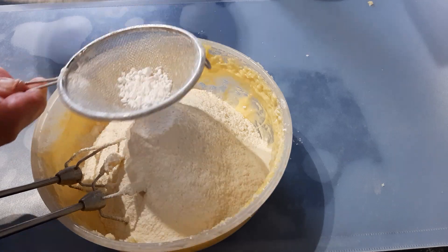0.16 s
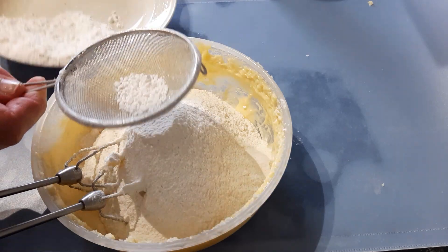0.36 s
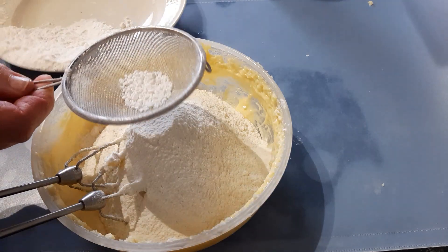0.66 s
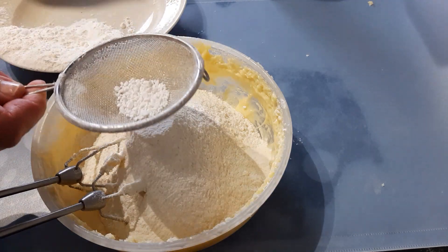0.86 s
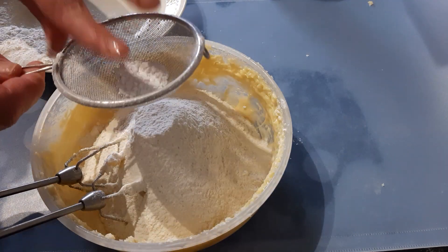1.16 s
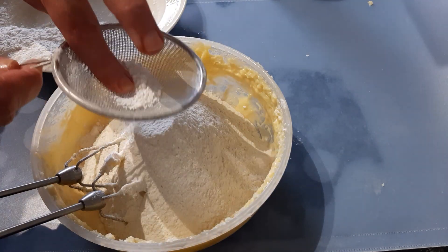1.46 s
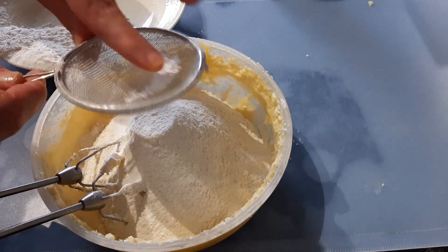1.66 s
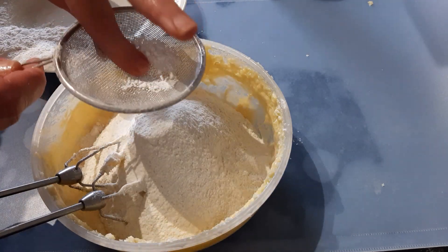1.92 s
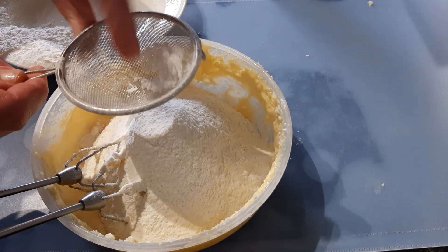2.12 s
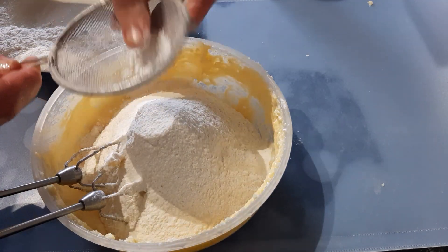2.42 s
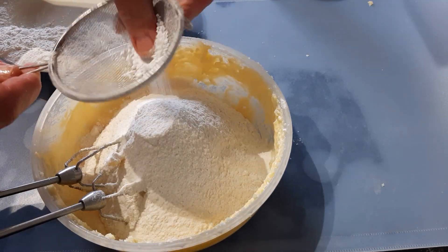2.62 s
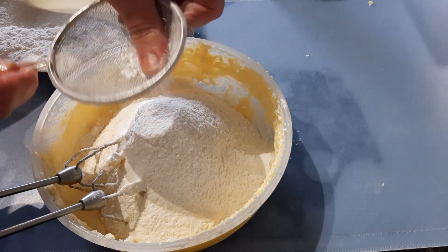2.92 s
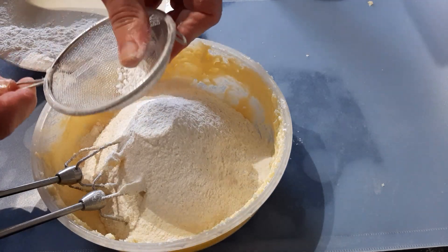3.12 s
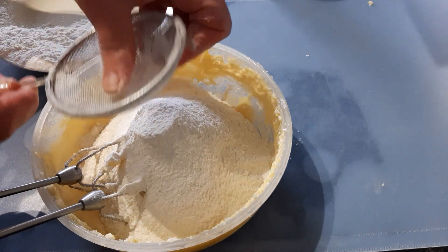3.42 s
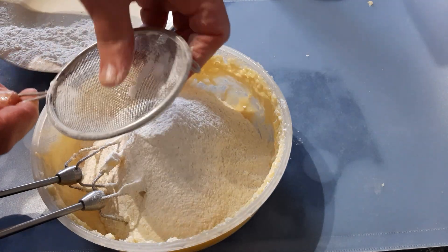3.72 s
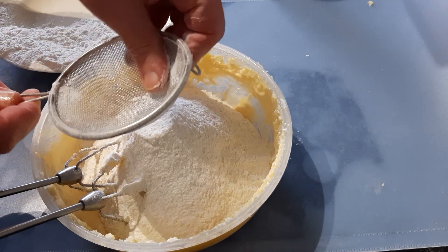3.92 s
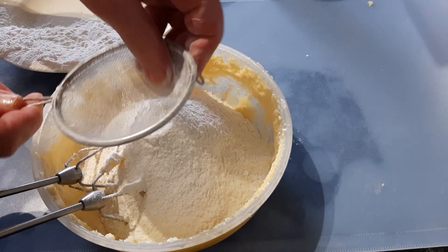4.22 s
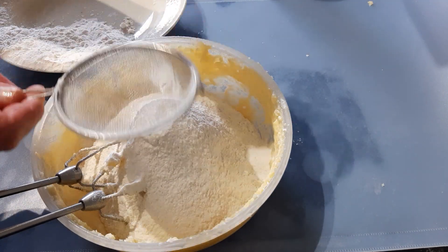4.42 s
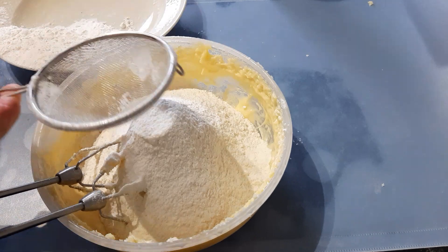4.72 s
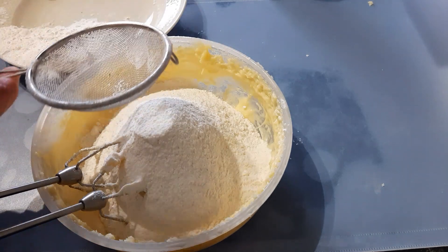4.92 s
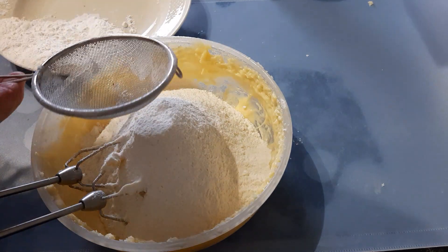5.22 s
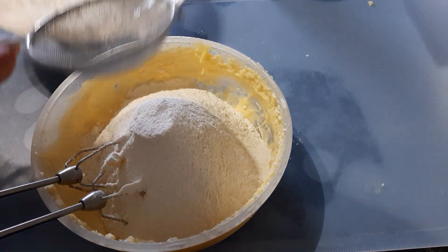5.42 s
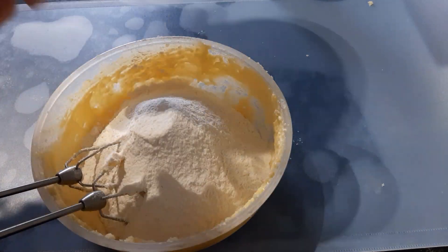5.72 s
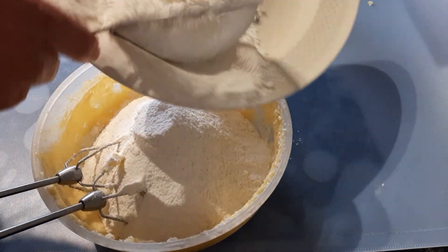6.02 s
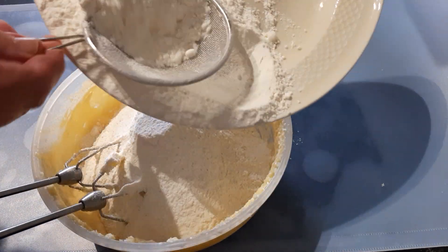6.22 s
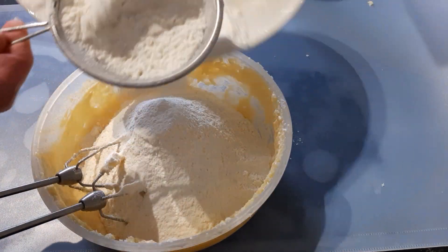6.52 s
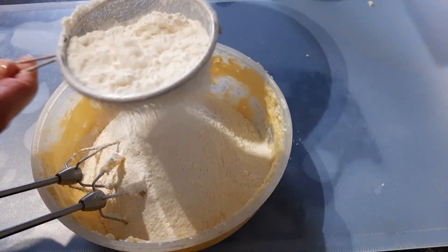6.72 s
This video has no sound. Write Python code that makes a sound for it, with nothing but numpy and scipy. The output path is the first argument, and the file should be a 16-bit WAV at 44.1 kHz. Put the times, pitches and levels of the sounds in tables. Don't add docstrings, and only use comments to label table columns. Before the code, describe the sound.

In a quiet kitchen with a low fridge hum and street rumble, a plate lands loudly on a table, bounces and rocks to rest with hollow, ringing knocks. Later a thumb rubs flour through wire mesh in soft, bright hissing strokes with tiny snaps. Finally the strainer's rim brushes, scrapes and clatters on the glazed plate. Close stereo microphone, hum leaning left.

```python
import sys
import numpy as np
from scipy import signal
from scipy.fft import rfft, irfft, next_fast_len
from scipy.io import wavfile
from scipy.ndimage import uniform_filter1d

SR = 44100
rng = np.random.default_rng(int(sys.argv[2]) if len(sys.argv) > 2 else 0)


def wav_record(signal):
    frames = np.transpose(np.atleast_2d(signal))
    bounded = np.clip(frames, -1, 1)
    quanta = np.round(bounded * 32767).astype(np.int16)
    wavfile.write(sys.argv[1], SR, quanta)


def ratio_of_db(decibels):
    return 10 ** (np.asarray(decibels, float) / 20)


N = 302481
TIME = np.arange(N) / SR
FFT = next_fast_len(N, True)
HZ = np.maximum(np.arange(FFT // 2 + 1) * SR / FFT, 1.)
KNOCK_PAN_DB, BASS_PAN_DB = 4, 4

# pitch_hz [Hz], level_db [dB]
GLAZE = [(3860, 5), (4790, -3), (5820, -1.5), (6330, 5), (7480, -3), (8330, 5), (8900, -1), (9420, 2),
         (9920, -12), (10900, -4), (12110, -10), (12700, -11.5), (13100, 1), (14950, -3.5)]


def on_hz(table):
    hz, value = np.transpose(table)
    return np.interp(np.log(HZ), np.log(hz), value)


def shape(x, gain):
    return irfft(rfft(x, FFT) * gain, FFT)[..., :N]


def unit(x):
    return x / np.sqrt(np.mean(x ** 2))


def band(lo_hz, hi_hz, order=3):
    return 1 / np.sqrt((1 + (lo_hz / HZ) ** (2 * order)) * (1 + (HZ / hi_hz) ** (2 * order)))


def resonances(peaks):
    return sum(ratio_of_db(db) / np.sqrt(1 + (2 * (HZ - hz) / width) ** 2) for hz, width, db in peaks)


def pan(db):
    return ratio_of_db(np.array([db, -db]) / 2)


def fade(t, t60):
    return np.exp(-np.log(1000) * t / t60)


def walk(rate):
    k = int(SR / rate)
    held = np.repeat(rng.standard_normal(N // k + 1), k)
    return 0.36 * uniform_filter1d(uniform_filter1d(held, k), k)[:N]


def pair(length=N):
    likeness = [(60, 0.3), (120, .93), (250, 0.5), (500, 1), (1000, 0.09), (3000, 0.04)]
    alike = np.clip(on_hz(likeness), 0, 1)
    mid, side = rng.standard_normal((2, length))
    mid, side = shape(mid, np.sqrt(1 + alike)), shape(side, np.sqrt(1 - alike))
    return np.array([mid + side, mid - side])[:, :length] / 2


def room_air():
    # time_s [s], level_db [dB]
    rumble = [(0.0, -65), (0.26, -71.5), (1.05, -67), (1.35, -68.5), (1.63, -76.5), (1.87, -72),
              (2.1, -66.5), (2.44, -71), (2.78, -64.5), (3.22, -69.5), (3.48, -66), (3.9, -68.5),
              (4.66, -70), (4.97, -64), (5.21, -70), (6.21, -68.5), (6.66, -74), (6.76, -64.5)]
    # pitch_hz [Hz], level_db [dB per Hz]
    floor_colour = [(25, -34.5), (40, -1.5), (55, -2), (100, -1.5), (150, -6.5), (270, -9), (340, -22.5),
                    (630, -23.5), (1000, -24.5), (1600, -31.5), (2500, -29.5), (5000, -37), (10000, -36.5),
                    (14000, -32)]
    # pitch_hz [Hz], width_hz [Hz], level_db [dB over the rumble]
    hum_peaks = [(111.77, 11, 6), (198.8, 13, 4.5), (243.5, 10, 7.5), (304, 8.2, 4), (574.7, 22, 4),
                 (1600, 30, 4.5), (3170, 83, 0), (7330, 89.3, -2.5)]
    # pitch_hz [Hz], left_minus_right_db [dB]
    floor_pan = [(40, 10.5), (120, 12), (250, 11.5), (450, 2.5), (1500, 3), (15000, 2)]
    lorry_s, lorry_lasts_s, lorry_db, port_lag_s = 4.38, 0.49, 10, .0007

    hum_db = np.interp(TIME, *np.transpose(rumble))
    deep_db = hum_db - 7.5 + lorry_db * np.exp(-((TIME - lorry_s) / lorry_lasts_s) ** 2)
    side = on_hz(floor_pan)
    colour = ratio_of_db(on_hz(floor_colour) + np.array([side, -side]) / 2) * (1 + resonances(hum_peaks))
    lag = np.exp(-2j * np.pi * np.minimum(HZ, 80) * port_lag_s * 2)
    air = shape(pair(), colour * np.array([lag, lag * 0 + 1]))
    layers = [shape(air, band(lo, hi, order=5)) for lo, hi in ((20, 80), (80, 350), (350, 20000))]
    deep, hum, hiss = (layer / np.std(layer.mean(axis=0)) for layer in layers)
    out = ratio_of_db(deep_db + 4.5 + 1.4926 * walk(3.4)) * deep
    out += ratio_of_db(hum_db + 0.5 + 1.653 * walk(2.0)) * hum
    return out + ratio_of_db(-77.5 + 0.382 * walk(8.5)) * hiss


def fridge_whine():
    whine = [(3058, -85, 6), (2958, -95, 4), (3158, -92.5, 4), (3108, -97, 4), (7300, -87.5, 0),
             (7250, -96, 0), (7400, -96, 0)]
    loaded_s, unloaded_s, ramp_s = 1.34, 5.8, 0.075
    load = np.clip(np.minimum(TIME - loaded_s, unloaded_s - TIME) / ramp_s + .5, 0, 1)
    out = np.zeros((2, N))
    for hz, db, pan_db in whine:
        level_db = db + 5 - 5 * (1.5 - load) + .8 * walk(6)
        tone = np.sin(2 * np.pi * (hz * TIME + rng.random((2, 1))))
        out += ratio_of_db(level_db) * pan(pan_db)[:, None] * tone
    return out


def swell(start, top, end, first_db, top_db, gone_db=-82.5):
    land_s, fall_bend = 0.027, 1.2
    rise = np.interp(TIME, [start - land_s, start, top], [gone_db, first_db, top_db], left=-130)
    fall = np.clip((TIME - top) / max(end - top, .02), 0, 6) ** fall_bend
    trickle = np.where(TIME > top, -17 - 121 * (TIME - top), -130)
    return np.maximum(rise + np.maximum(min(gone_db - top_db, -12) * fall, trickle), -130)


def grains(scatter_db, smear_s):
    size = ratio_of_db(scatter_db * np.minimum(rng.exponential(size=N), 7))
    keep = np.exp(-1 / (smear_s * SR))
    return unit(signal.lfilter([1 - keep], [1, -keep], size) * rng.standard_normal((2, N)))


def bursts(events, layers, attack_s):
    out, t = np.zeros((2, N)), TIME[:SR // 8]
    for s, peak_db, *rel_db, t60, pan_db in events:
        i = int(s * SR)
        hit = (1 - np.exp(-t / attack_s)) * fade(t, max(t60, .002))
        for layer, db in zip(layers, [0, *rel_db]):
            burst = hit * layer[:, i:i + len(t)]
            burst = burst / np.abs(burst).max(axis=1, keepdims=True)
            out[:, i:i + len(t)] += ratio_of_db(peak_db + db - 4) * pan(pan_db)[:, None] * burst
    return out


def strokes():
    # lands_s, hardest_s, lifts_s [s], landing_db, hardest_db [dB]
    stroke_rows = [(0, 0.012, 0.11, -64.5, -62.5), (.05, 0.186, 0.22, -71.5, -69.5),
                   (1.427, 1.52, 1.64, -70, -63.5), (1.737, 1.727, 1.78, -61, -65),
                   (1.8, 2.005, 2.03, -76.5, -57.5), (2.172, 2.16, 2.2, -67.5, -68),
                   (2.21, 2.22, 2.31, -76, -75.5), (2.489, 2.494, 2.82, -73.5, -70),
                   (2.62, 2.68, 2.78, -67.5, -56), (2.92, 2.93, 3.24, -71, -68.5),
                   (2.975, 3.04, 3.15, -65, -50.5), (3.27, 3.338, 3.43, -62, -52.5),
                   (3.51, 3.553, 3.62, -70.5, -59.5), (3.59, 3.642, 3.71, -56.5, -52),
                   (3.852, 3.939, 4, -67, -56.5), (4.203, 4.23, 4.28, -56, -49),
                   (4.25, 4.27, 4.33, -50.5, -52.5), (4.48, 4.3, 4.68, -74, -70)]
    # lands_s, hardest_s, lifts_s [s], landing_db, hardest_db [dB]
    rasp_rows = [
        (2.657, 2.7, 2.77, -85, -80),
        (2.92, 2.93, 2.96, -77, -75.5),
        (2.988, 3.065, 3.124, -78, -64.5),
        (3.307, 3.349, 3.43, -81, -72),
        (3.545, 3.55, 3.62, -80, -72.5),
        (3.602, 3.635, 3.695, -71.5, -69),
        (3.885, 3.93, 3.99, -81, -76.5),
        (4.204, 4.24, 4.34, -67.5, -61),
    ]
    # pitch_hz [Hz], level_db [dB per Hz]
    mesh = [(3530, -25), (6000, -13), (6680, -7), (8160, -2.5), (9380, -4), (12100, 0), (15000, 0.5),
            (16000, -4)]
    # time_s [s], peak_db, middle_db [dB], t60_s [s], left_minus_right_db [dB]
    cracks = [
        (1.7282, -55, -14, 0.044, 5),
        (1.7736, -52, -24, 0.032, 1.0),
        (2.1687, -50, -30, 0.06, -2),
        (2.4925, -53, -23, 0.05, 3.0),
        (2.904, -55, -19, 0.059, 3),
        (2.9739, -50.5, -24, 0.05, 4),
        (3.514, -51.5, -24, 0.098, 2.0),
        (3.546, -49, -18, 0.026, -2),
        (4.2017, -54, -26, 0.028, 3.5),
        (4.4777, -61, -26, 0.05, -0.5),
    ]
    # time_s [s], peak_db, middle_db, left_minus_right_db [dB]
    snaps = [
        (1.501, -52, -20, 10),
        (1.9712, -47, -16, 7),
        (3.024, -46, -10, 1.5),
        (3.0354, -46, -18, 0.5),
        (3.3335, -46, -20, 0.0),
        (3.346, -43, -17, 7),
        (3.5965, -48, -16, 1.5),
        (3.9193, -46, -6, 6),
        (4.224, -39, -17, 1.0),
    ]
    hiss_db = np.max([swell(*row) for row in stroke_rows], axis=0)
    press_db = np.interp(TIME - .003, TIME, hiss_db)
    middle_db = -9 + .2 * (press_db + 53.5)
    rasp_db = np.max([swell(*row) for row in rasp_rows], axis=0)

    slips = rfft(grains(scatter_db=3.5, smear_s=0.00099) * ratio_of_db(4.6 * walk(60)), FFT)
    gains = [ratio_of_db(on_hz(mesh)) * band(7200, 20000), band(3860, 6550, order=8), band(1750, 2950, order=6)]
    hiss, middle, rasp = (unit(irfft(slips * gain, FFT)[:, :N]) for gain in gains)
    rub = ratio_of_db(hiss_db + 2.0) * hiss + ratio_of_db(press_db + 1.5 + middle_db) * middle + ratio_of_db(rasp_db) * rasp
    snap_t60_s = 0.0082
    hits = [tuple(row) for row in cracks] + [(*row[:3], snap_t60_s, row[3]) for row in snaps]
    return pan(2.19)[:, None] * rub + bursts(hits, [hiss, middle], attack_s=0.00068)


def ringing(x, hz, width):
    b, a = signal.iirpeak(hz, hz / width, fs=SR)
    return unit(signal.lfilter(b, a, signal.lfilter(b, a, x)))


def singing(slips):
    # start_s, end_s [s], level_db [dB]
    nudges = [
        (0.321, 0.399, -68),
        (5.285, 5.305, -67.5),
    ]
    # start_s, end_s [s], level_db [dB], tilt_db [dB per octave]
    chatter = [
        (5.587, 5.649, -84.5, 5),
        (5.795, 5.818, -76, 1),
        (5.885, 5.935, -88, 9),
        (5.968, 6.02, -75, 5),
        (6.03, 6.083, -74, 6),
        (6.086, 6.154, -64.5, 5.5),
        (6.18, 6.268, -67, -15),
        (6.28, 6.32, -70, 1),
        (6.362, 6.4, -79, 2),
        (6.328, 6.442, -87, -5),
    ]
    hollow_hz = 990
    out, flicker = np.zeros((2, N)), walk(60)
    calls = [(start, end, db, hollow_hz) for start, end, db in nudges]
    chances = rng.standard_normal((len(chatter), 3, len(GLAZE)))
    for (start, end, db, tilt_db), luck in zip(chatter, chances):
        for (hz, mode_db), size, late, bend in zip(GLAZE, *luck):
            shift = 0.13 * late * (end - start)
            patchy_db = 4 * (hz > 4000) * (np.tanh(size) - 1.4)
            level_db = db + mode_db + tilt_db * np.log2(hz / 3860) + patchy_db
            stray_hz = hz * (1 + .006 * bend * (hz > 4000))
            calls.append((start + shift, end + shift, level_db, stray_hz))
    for start, end, db, hz in calls:
        i, j = int((start - .01) * SR), int((end + 0.014) * SR)
        gate = np.interp(TIME[i:j], [start - .004, start + 0.0034, end, end + .015], [0, 1, 1, 0])
        own = flicker[(np.arange(i, j) + 20 * int(hz)) % N] * (hz > 2000)
        out[:, i:j] += ratio_of_db(db - 7 + 11 * own) * gate * ringing(slips[:, i:j], hz, 170.)
    return out


def hand_thuds():
    # starts_s, loudest_s, ends_s [s], first_db, loudest_db [dB]
    thuds = [
        (4.7, 4.716, 4.785, -86, -64.5),
        (5.025, 5.128, 5.276, -80, -60),
    ]
    level_db = np.max([swell(*row) for row in thuds], axis=0)
    return ratio_of_db(level_db) * unit(shape(pair(), band(250, 500)))


def contact_levels():
    # starts_s, loudest_s, ends_s [s], level_db, brightness_db [dB]
    touches = [
        (4.703, 4.713, 4.97, -78.5, 0),
        (5.053, 5.12, 5.32, -67.5, -1.5),
        (5.278, 5.295, 5.43, -73.5, -10),
        (5.445, 5.49, 5.5, -77.5, -7),
        (5.567, 5.63, 5.85, -78, -4),
        (6.494, 6.597, 6.68, -87.5, 0),
        (6.697, 6.702, 7.1, -86, 0),
    ]
    # time_s [s], level_db, brightness_db [dB]
    scoop = [(5.69, -78, -17), (5.744, -64.5, -8.5), (5.8, -68, -7), (5.87, -65.5, -1), (5.932, -72, 1),
             (5.944, -75.5, 2.5), (6.078, -66.5, -3.5), (6.094, -61, -6), (6.145, -56, -3.5),
             (6.184, -59, -11), (6.205, -56.5, -6), (6.26, -57, -9), (6.33, -67, -5.5), (6.36, -67, -4),
             (6.39, -69.5, -2.5), (6.52, -86, -1)]
    s, level_db, bright_db = np.transpose(scoop)
    body_db = [np.interp(TIME, s, level_db, left=-130, right=-130)]
    scrape_db = [body_db[0] + np.interp(TIME, s, bright_db)]
    for start, top, end, db, bright in touches:
        body_db.append(swell(start, top, end, db - 11, db, gone_db=-100))
        scrape_db.append(body_db[-1] + bright)
    return np.max(body_db, axis=0), np.max(scrape_db, axis=0)


def handling():
    # time_s [s], peak_db, body_db, treble_db, left_minus_right_db [dB]
    taps = [
        (0.2613, -65.5, 4, -21, 2),
        (0.3571, -60, 5, -27, 0),
        (4.71, -61, -11, -9, -3),
        (5.089, -57, -12, -9, -5),
        (5.1339, -60.5, -4, -14, 6),
        (5.281, -65, 7, -15, 1),
        (5.8033, -52.5, -18, -2, 14),
        (5.893, -59, -7, 1, 17),
        (5.926, -59, -15, 6, 12),
        (6.0449, -60.5, -13, 6, 16),
    ]
    # time_s [s], peak_db, body_db, treble_db [dB], t60_s [s]
    clatter = [(6.087, -51, 12, -8, .05), (6.1158, -51, 13, -8, .025), (6.1502, -52, 11, -12, .02),
               (6.1588, -38, 4, -9, .014), (6.1635, -36, 3, -9, .016), (6.1675, -42, -3, -7, .02),
               (6.196, -50, 0, -14, .04), (6.233, -52, 0, -16, .025), (6.243, -53, 2, -16, .02),
               (6.27, -52, -2, -14, .03), (6.324, -56, -4, -12, .02)]
    # pitch_hz [Hz], width_hz [Hz], level_db [dB]
    plate = [(593.3, 90, -2.5), (862.6, 29, -4), (1142.5, 78, -1), (1876, 59, -5.5), (2225, 63, -7)]
    body_db, scrape_db = contact_levels()
    ring_db = np.where(body_db > -120, -74 + 0.39 * (scrape_db + 64), -130)
    slips = grains(scatter_db=4.0, smear_s=0.0017) * ratio_of_db(1.3 * walk(64))
    modes = 0
    for hz, width, db in plate:
        favour_db = db + 10 * np.log10(width) + 2.5 * walk(9.2)
        modes = modes + ratio_of_db(favour_db) * ringing(slips, hz, 2.7 * width)
    peak, dip = resonances([(5378, 1900, 3)]), resonances([(3520, 190, 14.6)])
    rustle = shape(slips, band(669.8, 1720, order=1) * (1 + peak) / (1 + dip))
    glaze = 2 + resonances([(hz, 220, 7 + db / 2) for hz, db in GLAZE])
    sound = rfft(ratio_of_db(-8) * unit(modes) + unit(rustle), FFT) * glaze
    gains = [band(503, 1340, order=4), band(1800, 6700, order=8), band(9400, 15960, order=5)]
    body, scrape, ring = (unit(irfft(sound * gain, FFT)[:, :N]) for gain in gains)
    slide = ratio_of_db(body_db - 0.5) * body + ratio_of_db(scrape_db + 1.0) * scrape + ratio_of_db(ring_db + 3.0) * ring
    slide = slide + singing(slips)
    tap_t60_s, clatter_pan_db = 0.027, 9
    hits = [(*row[:4], tap_t60_s, row[4]) for row in taps] + [(*row, clatter_pan_db) for row in clatter]
    clicks = bursts(hits, [scrape, body, ring], attack_s=0.00094)
    return pan(1.9)[:, None] * slide + hand_thuds() + clicks


def crack_and_room(t, hz, tilt_db, treble_db, crack_db):
    # pitch_hz [Hz], level_db [dB per Hz]
    knock_colour = [(45, -56), (72, -24), (100, -14), (235, -10.5), (308, -5.5), (405, -21), (480, -10.5),
                    (1150, -11), (1320, -16.5), (2300, -33), (3900, -43), (5200, -51), (13400, -59.5),
                    (16000, -65.5)]
    # pitch_hz [Hz], t60_s [s]
    room_t60 = [(60, 0.51), (300, .46), (1000, 0.4), (2200, 0.38), (6000, 0.28), (12000, 0.16)]
    room_hz, room_s = np.transpose(room_t60)
    centres = 45 * 2 ** np.arange(0, 8.6, .5)
    t60s = np.interp(np.log(centres), np.log(room_hz), room_s)
    colour = ratio_of_db(np.interp(hz, HZ, on_hz(knock_colour)))
    noise = rfft(pair(len(t))) * colour * ratio_of_db(tilt_db)
    sound = 0
    for centre, t60 in zip(centres, t60s):
        share = np.maximum(0, 1 - 2 * np.abs(np.log2(hz / centre)))
        direct = pan(KNOCK_PAN_DB)[:, None] * fade(t, 0.029 * (1 + 150 / centre))
        room_pan = pan(BASS_PAN_DB * (centre < 200) + 3 * (centre > 400))[:, None]
        room = room_pan * (1 - np.exp(-t / 0.0029)) * fade(t, t60)
        room_db = -4 + .6 * treble_db * (centre > 1400)
        mix = ratio_of_db(0.99 * crack_db) * direct + ratio_of_db(room_db) * room
        sound = sound + irfft(noise * share, len(t)) * mix
    return sound / np.sqrt(np.mean(sound[:, :SR // 50] ** 2))


def table_ring(t, hz, tilt_db, modes):
    out = 0
    for (f, db, t60), (size, left, right) in zip(modes, rng.standard_normal((len(modes), 3))):
        turn = np.array([[left], [right]]) * min(f / 900, 1.5)
        lean_db = KNOCK_PAN_DB + BASS_PAN_DB * (f < 200) - 3 * (200 < f < 400)
        gain = ratio_of_db(-2 + db + 1.5 * size + np.interp(f, hz, tilt_db)) * pan(lean_db)
        out = out + gain[:, None] * fade(t, min(0.99 * t60, .5)) * np.sin(2 * np.pi * f * t + turn)
    return out


def plate_blow(t, treble_db, crack_db):
    hollow = .8 * np.sin(2 * np.pi * 740 * t) + .4 * np.sin(2 * np.pi * 1030 * t)
    blow = -ratio_of_db(crack_db + 5.0) * np.minimum(t / 0.0022, 1) * fade(t, 0.04) * hollow
    blow = blow + ratio_of_db(treble_db - 35) * fade(t, 0.18) * np.sin(2 * np.pi * 3860 * t)
    return pan(KNOCK_PAN_DB)[:, None] * blow


def knocks():
    # time_s [s], peak_db, bass_db, treble_db, crack_db [dB]
    knock_rows = [
        (.4147, -9, -1.5, -0.5, 4.5),
        (.4285, -21.5, -2, -4, -4.5),
        (.468, -22.5, 2.5, 2, -6),
        (.5722, -14.5, 3.5, -4, 3),
        (.6812, -17.5, 3.5, -6.5, -1),
        (.689, -17, -6, -7, 7.5),
        (.7132, -10.5, -4, 4, 8.5),
    ]
    # pitch_hz [Hz], level_db [dB], t60_s [s]
    landing = [(102, -11, 0.75), (140, -11, 1.1), (309, 3, 0.7), (335, -9, 0.29), (452, -1, 0.1),
               (528, -5, 0.18), (648, -6, 0.39), (716, -14, 0.5), (807, -17, 0.63), (851, -16, 1.0),
               (947, 0, 0.13), (1034, -3, 0.19), (1227, -5, 0.17), (1567, -22, 0.42)]
    # pitch_hz [Hz], level_db [dB], t60_s [s]
    rebound = [(102, -12, .3), (140, -6, .3), (222, -8, .3), (309, -5, .4), (452, -12, .12), (528, 4, .16),
               (646, 0, .13), (738, -12, .2), (812, -14, .2), (856, -17, .3), (947, -14, .15),
               (1030, -12, .2), (1222, -18, .2), (1916, -30, .25)]
    # pitch_hz [Hz], level_db [dB], t60_s [s]
    resting = [(86.1, -10, 0.35), (135, -10, 0.32), (199, -10, 0.53), (309, -6, 0.35), (458, -11, 0.38),
               (528, -14, 0.48), (646, -7, 0.45), (738, -14, 0.35), (851, -5, 0.32), (969, -9, 0.3),
               (2116, -27, 0.2), (1217, -10, 0.35), (1491, -16, 0.33), (1870, -17, 0.2)]
    out, t = np.zeros((2, N)), TIME[:SR * 3 // 4]
    hz = np.maximum(np.arange(len(t) // 2 + 1) * SR / len(t), 1.)
    push = np.sin(np.pi / 2 * np.minimum(t / .0015, 1)) ** 2
    push = push * np.exp(-(t / 0.45) ** 2)
    for k, (s, peak_db, bass_db, treble_db, crack_db) in enumerate(knock_rows):
        tilt_db = np.interp(np.log(hz), np.log([150, 400, 1100, 2200]), [bass_db, 0, 0, treble_db])
        modes = landing if k < 3 else rebound if k < 4 else resting
        sound = crack_and_room(t, hz, tilt_db, treble_db, crack_db)
        sound = sound + table_ring(t, hz, tilt_db, modes) + plate_blow(t, treble_db, crack_db)
        i = int(s * SR)
        out[:, i:i + len(t)] += ratio_of_db(peak_db - 5.5) * push * sound
    return signal.sosfilt(signal.butter(2, 70.5, "high", fs=SR, output="sos"), out)


def scene():
    return room_air() + fridge_whine() + strokes() + handling() + knocks()


def band_limit(x):
    return signal.sosfilt(signal.butter(12, 16990, fs=SR, output="sos"), x)


def record(dry):
    cut = signal.sosfilt(signal.ellip(8, .2, 70, 15800, fs=SR, output="sos"), dry)
    cut = signal.sosfilt(signal.butter(4, 36, "high", fs=SR, output="sos"), cut)
    return band_limit(np.clip(cut, -1, 1))


dry = scene()
out = record(dry)
wav_record(out)
```